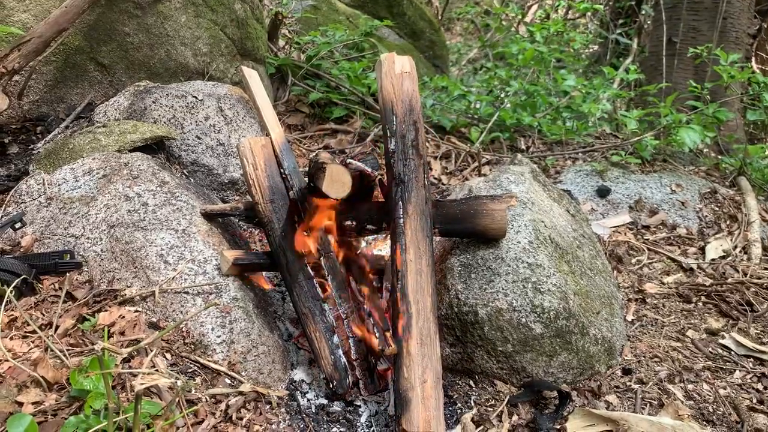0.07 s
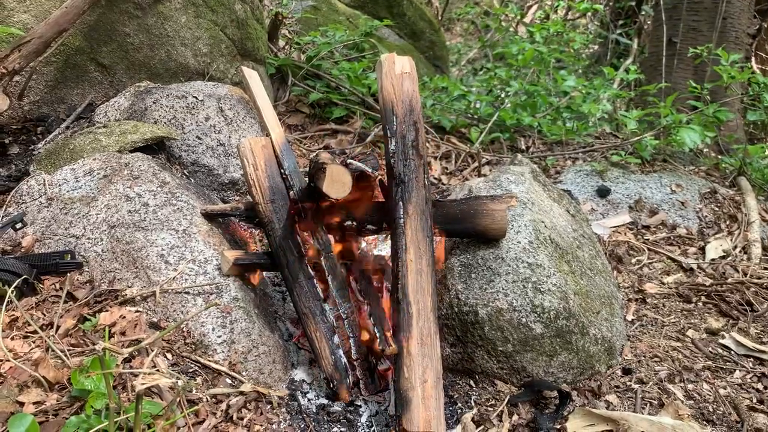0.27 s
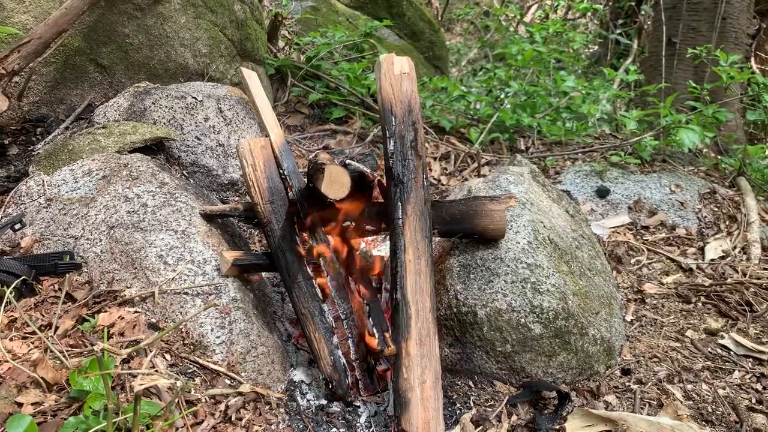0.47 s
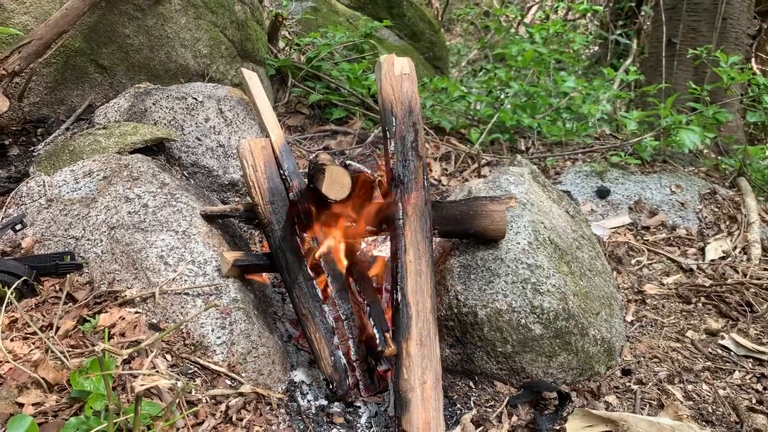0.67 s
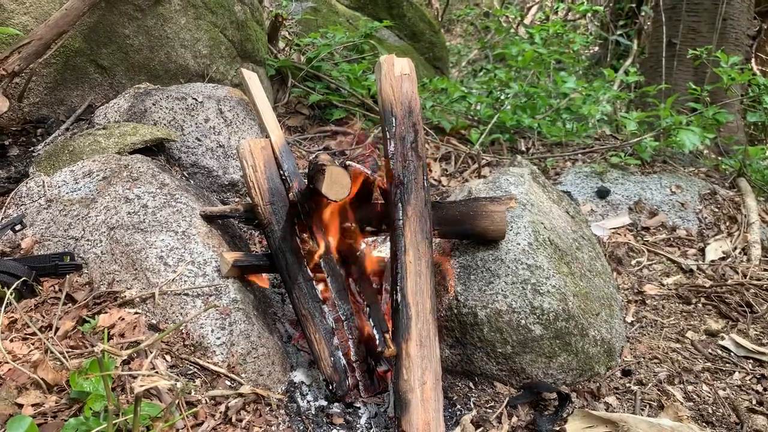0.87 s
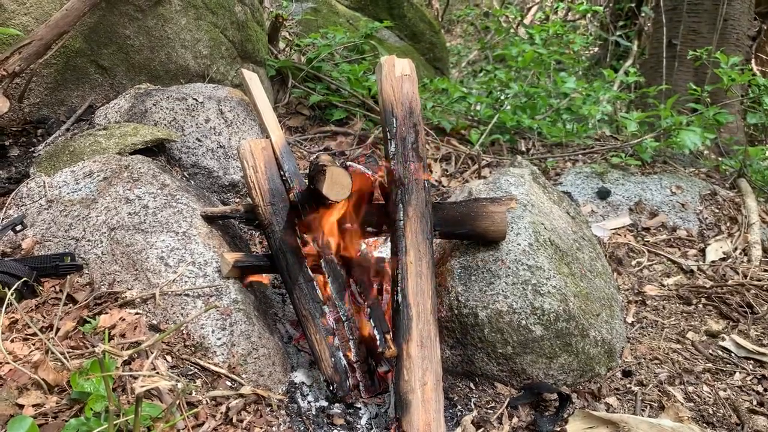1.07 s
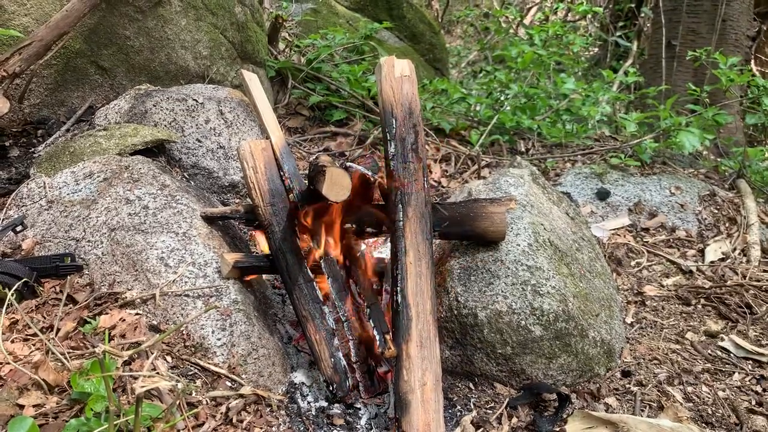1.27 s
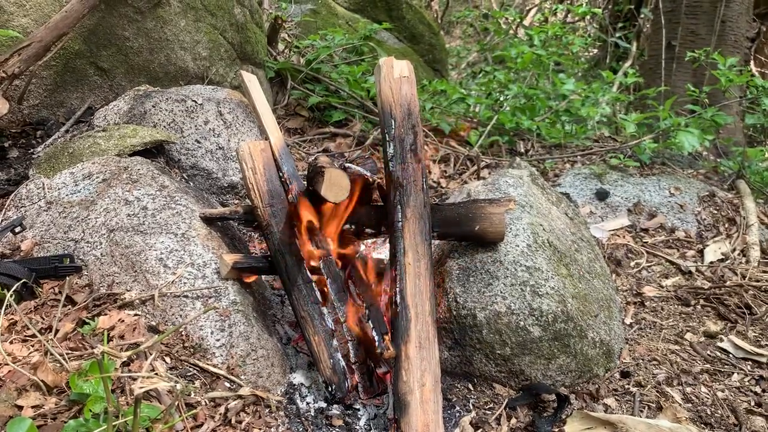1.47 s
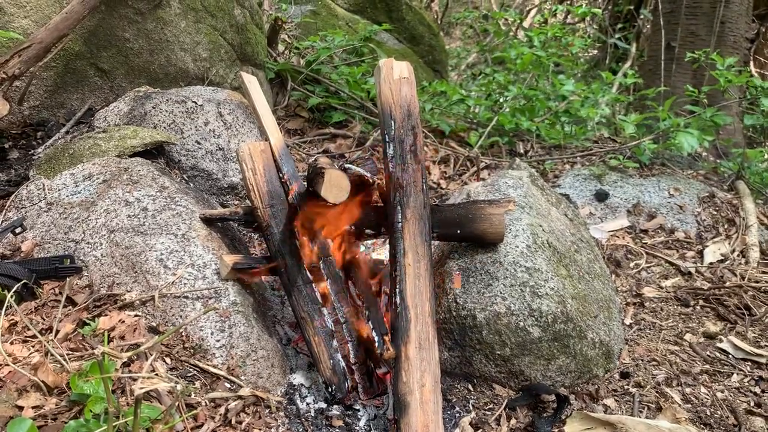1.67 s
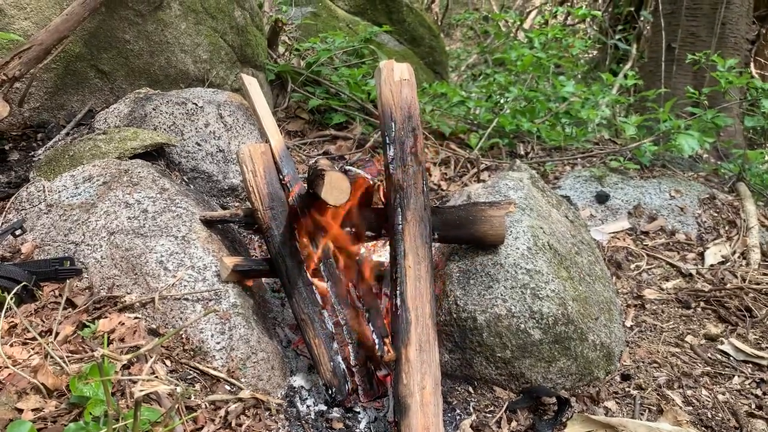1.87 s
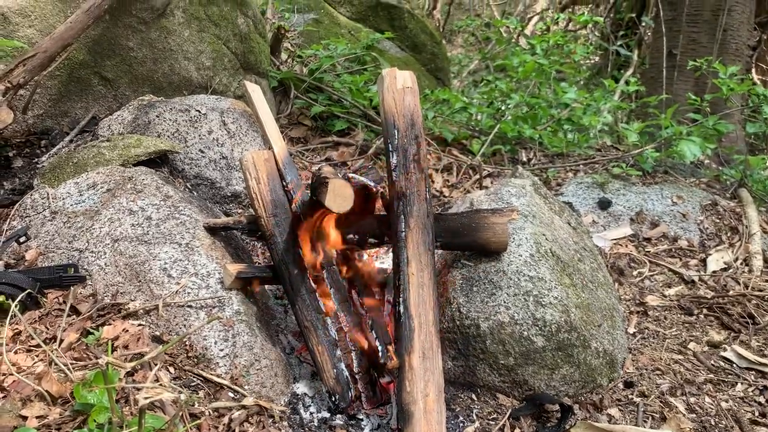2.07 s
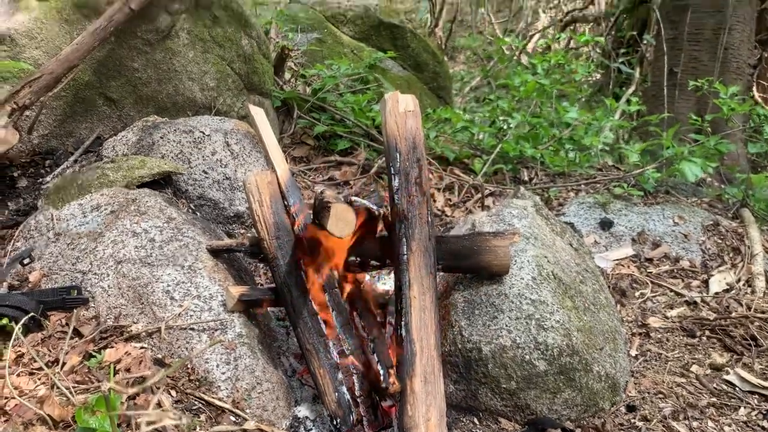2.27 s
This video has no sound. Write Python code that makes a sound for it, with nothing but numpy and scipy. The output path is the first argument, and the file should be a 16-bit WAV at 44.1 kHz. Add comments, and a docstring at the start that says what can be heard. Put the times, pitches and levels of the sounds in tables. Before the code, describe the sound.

Close stereo pickup of a campfire between stones outdoors: steady low burning, one loud early crack that makes the level dip briefly, then irregular smaller pops, a sharper pair midway, and dull flame puffs near the end.

```python
"""A low flutter of flames with a soft hiss, and almost at once a sharp pop: a small wood campfire.
It burns between rocks in a quiet forest, close by and a little to the right. The burning is shaped noise.
Soft puffs are short, dull thumps of flame. The pops, and a faint high tick just before the loudest,
are each one pulse and a spray of noise through ringing resonances, scattered by rocks and trees.
Low notes trail the crack, so a pop ends in a falling thud; the loudest makes the gain control duck."""
import sys
import numpy as np
from scipy import signal
from scipy.fft import rfft, irfft
from scipy.io import wavfile
from scipy.ndimage import uniform_filter1d, minimum_filter1d

SR = 44100
rng = np.random.default_rng(int(sys.argv[2]) if len(sys.argv) > 2 else 0)


def dump_mix(stems):
    """Bounce the given channels to the path in sys.argv[1] as a 16-bit WAV at rate SR."""
    frames = np.atleast_2d(stems).T  # one column per channel
    limited = np.clip(frames, -1, 1)  # hard clip at full scale
    pcm = np.round(limited * 32767).astype(np.int16)
    wavfile.write(sys.argv[1], SR, pcm)


N = 101430
FREQS = np.maximum(np.arange(N // 2 + 1) * SR / N, 1)  # Hz, kept above zero for the logarithms
FLAME_TOP_HZ = 600  # below it the flames dominate, above it the hiss and the scattered treble


def amp(db):
    """Turn decibels into a gain."""
    return 10 ** (np.asarray(db) / 20)


def curve(points):
    """Join (Hz, value) points by straight lines on a log-frequency axis."""
    hz, value = np.array(points, float).T
    return np.interp(np.log(FREQS), np.log(hz), value)


def causal(gain):
    """Spectrum of the most abrupt sound that has this gain (minimum phase)."""
    cepstrum = irfft(np.log(gain + 1e-9), N)
    # fold the second half onto the first, so that nothing sounds before the start
    fold = 1 + np.sign(np.fft.fftfreq(N))
    return np.exp(rfft(cepstrum * fold))


def pan(points):
    """Left and right gains of equal total power, from left minus right in dB."""
    difference_db = curve(points)
    gains = amp(np.array([difference_db, -difference_db]) / 2)
    return gains / np.sqrt(np.mean(gains ** 2, axis=0))


def delay(seconds):
    """Spectrum of a pure delay."""
    return np.exp(-2j * np.pi * FREQS * seconds)


LEFT_LAG_S = 0.0003966


def both_sides():
    """Sound from the fire reaches the right side first and the left a moment later."""
    return np.array([delay(LEFT_LAG_S), delay(0)])


def walk(rate_hz):
    """Slow random wander with a spread near 1: random steps, smoothed twice."""
    k = int(SR / rate_hz)
    steps = np.repeat(rng.standard_normal(N // 100), k)[:N]
    smooth = uniform_filter1d(uniform_filter1d(steps, k), k)
    return np.sqrt(2) * smooth


def burst(decay_s):
    """Spectrum of a dying noise of unit energy, unrelated left and right."""
    fade = np.exp(-np.arange(N) / SR / decay_s)
    noise = rng.standard_normal((2, N)) * fade
    return rfft(noise / np.sqrt(np.sum(noise ** 2, axis=1, keepdims=True)))


def resonance(hz, width_hz):
    """Gain of one resonance, 1 at its centre and falling off to both sides."""
    return 1 / np.hypot(1, (FREQS - hz ** 2 / FREQS) / width_hz)


# low notes are late by about this many of their own cycles, fading out above the top
LOW_LAG_CYCLES, LOW_LAG_TOP_HZ = 1.35, 1274


def late_lows(spectrum):
    """Turn a spectrum back into a wave, with the lows trailing the highs."""
    cycles = LOW_LAG_CYCLES * np.log((1 + FREQS / 20) / (1 + FREQS / LOW_LAG_TOP_HZ))
    return irfft(spectrum * np.exp(-2j * np.pi * cycles), N)


# Tone of the steady burning. Each row: frequency in Hz, relative level in dB per Hz.
BURN_COLOUR = [(20, -13), (45, 3), (80, -2), (130, 1), (200, 0.5), (310, -0.5), (430, -8), (700, -11.5),
               (1000, -12), (1400, -13.5), (1750, -15.5), (2250, -15), (3000, -23.5), (4300, -19.5),
               (5400, -26), (7000, -21.5), (8000, -33), (8900, -57.5), (12000, -52.5), (16000, -64.5)]
# Balance of the burning and the puffs. Each row: frequency in Hz, left minus right in dB.
BURN_PAN = [(60, 0.5), (110, -6), (250, 1), (1200, -1.5), (2400, -8), (4400, -7), (7500, 1)]
# How alike the two sides are. Each row: frequency in Hz, share of the power common to both sides (0 to 1).
LIKENESS = [(100, 0.54), (300, 0.91), (1300, 0.66), (3000, 0.083), (8000, 0.067)]
# Slow swell of the low flames. Each row: time in seconds, level in dB.
FLAME_LEVEL = [(0, -1), (.6, 0), (.9, 1), (1.2, 1), (1.65, -2), (1.85, 1), (2.3, 1.5)]
BURN_DB = -41
FLUTTER_DB, HISS_FLICKER_DB, FLUTTER_HZ = 1.5, 1.5, 14.38  # spread of each wander, and its new steps a second
SIZZLE_PER_S, SIZZLE_DB = 200, -20  # average number of ticks, and their level against the airy noise


def burning():
    """Noise flutters as flames in the lows; above, it is a hiss with tiny ticks from the embers."""
    share = np.clip(curve(LIKENESS), 0, 1)
    common = np.sqrt(share) * both_sides() * rfft(rng.standard_normal(N))
    separate = np.sqrt(1 - share) * rfft(rng.standard_normal((2, N)))
    air = common + separate

    ticks = (rng.random(N) < SIZZLE_PER_S / SR) * rng.standard_normal(N)
    sizzle = amp(SIZZLE_DB) * both_sides() * rfft(ticks / ticks.std())

    colour = amp(curve(BURN_COLOUR))
    colour = amp(BURN_DB) * colour / np.sqrt(np.mean(colour ** 2)) * pan(BURN_PAN)

    low = 1 / (1 + (FREQS / FLAME_TOP_HZ) ** 2)
    swell_db = np.interp(np.arange(N) / SR, *np.array(FLAME_LEVEL).T)
    flutter = amp(swell_db + FLUTTER_DB * walk(FLUTTER_HZ))
    flames = irfft(air * colour * low, N) * flutter
    flicker = amp(HISS_FLICKER_DB * walk(FLUTTER_HZ))
    hiss = irfft((air + sizzle) * colour * (1 - low), N) * flicker
    return flames + hiss


# Soft puffs of flame. Each row: start in seconds, pitch in Hz, level in dB, width in octaves.
PUFFS = [(1.052, 54, 16.5, 0.2), (1.807, 125, 20.5, 0.28), (1.854, 113, 23, 0.35), (2.033, 116.7, 26, 0.87),
         (2.253, 50.6, 17.5, 0.33)]


def puffs():
    """Gas catches fire in dull, falling thumps, each a narrow hump of low notes."""
    out = 0
    for start, hz, db, octaves in PUFFS:
        hump = np.exp(-(np.log2(FREQS / hz) / octaves) ** 2 / 2)
        out = out + amp(db) * hump * delay(start)
    return late_lows(out * both_sides() * pan(BURN_PAN))


# Resonances of a split log. Each row: ratio to the ring pitch, level in dB, width in Hz.
WOOD_MODES = [(.73, -1, 254), (1, 2.5, 256), (1.18, -15, 250), (1.38, -14.5, 248)]


def wood(ring_hz):
    """Gain of the brief resonances of a split log, with the notes far above them cut."""
    power = 0
    for ratio, db, width_hz in WOOD_MODES:
        power = power + (amp(db) * resonance(ratio * ring_hz, width_hz)) ** 2
    return np.sqrt(power) / np.hypot(1, (FREQS / ring_hz / 1.345) ** 3)


# Pops, and a faint high tick just before the loudest. Each row: start in seconds, then relative levels in dB
# of the low thud, knock, bite, crack and top fizz, ring pitch in Hz, its level in dB, splinter decay in
# seconds, lower ping in Hz, its level in dB, upper ping in Hz, its level in dB, extra left minus right in dB.
POPS = [(0.0482, 13, 3, -8, -8, -20, 1880, 8.5, 0.00096, 890, 9, 3390, 10, -1),
        (0.2394, 3, -2, -15, -5.5, -23.5, 2000, -9, 0.0012, 1000, 5, 4340, 11, 2),
        (0.2405, 32.5, 8.5, 18, -4.5, -13, 2000, 25.5, 0.0038, 1490, 18, 2515, 20, 0.5),
        (0.6755, -15, -18, -14, -17.5, -26.5, 2480, -11.5, 0.00089, 4340, -24, 6840, -1, 1),
        (1.0366, 18.5, -4, -9, -16.5, -36, 1410, 11, 0.0012, 1200, 11.5, 1900, 5, -0.5),
        (1.1148, -4, -21, -17, -28, -41, 2330, -8.5, 0.00067, 4430, -22, 6900, -20, 0),
        (1.4339, 20, 14.5, 10.5, 5.5, -5, 1920, 15.5, 0.0011, 4500, 10, 6780, 17, 0),
        (1.479, 10.5, 6, -1, 0.5, -20, 1860, 9, .001, 3950, 13, 4520, 4.5, -3.5),
        (2.1433, 8.5, 5, 5, -7.5, -7.5, 2080, -5, 0.0012, 4540, 7, 5800, 10, -2)]
# Where thud, knock, bite, crack and fizz lie. One column: frequency in Hz.
POP_ANCHORS_HZ = [320, 800, 2300, 4500, 10500]
# Colour that all these sounds share. Each row: frequency in Hz, added level in dB.
POP_COLOUR = [(25, -14), (90, -8.5), (240, 1), (450, -4), (900, 1.5), (1150, -5), (1400, -1.5),
              (1630, -16.5), (1950, 0.5), (2300, 1.5), (2550, -4.5), (2900, -0.5), (3250, 2.5), (3700, 9),
              (4200, 8), (4550, 4.5), (4950, -6), (6000, 10), (7500, 13), (8800, -4), (12000, -1.5),
              (16000, -32)]
# Balance of the pops and the tick. Each row: frequency in Hz, left minus right in dB.
POP_PAN = [(100, -12), (280, 3), (650, -3), (1300, -11), (2100, -14.5), (3500, -2), (7000, 4), (12000, 2)]
PING_WIDTH_HZ = 100  # of the two narrow high resonances
SPLINTER_DB = -2  # short noise right after the pulse, like tearing fibres
STONE_ECHO_S, STONE_ECHO_DB = 0.001087, -10.5  # the nearest stone throws the sound back
ROCKS_S, ROCKS_DB = 0.005, -9  # scatter from the stones around the fire
FOREST_S, FOREST_DB = 0.015, -13.5  # scatter from the trees


def pops():
    """A pulse and a spray of splinter noise drive wood and ping resonances; rocks and trees scatter them.
    Gas pockets bursting in the wood make the pops; the faint tick is built the same way."""
    out = 0
    treble = FREQS ** 2 / (FREQS ** 2 + FLAME_TOP_HZ ** 2)
    echo = amp(STONE_ECHO_DB) * treble
    splinters = amp(SPLINTER_DB) * treble
    pulse = both_sides() * (1 + echo * delay(STONE_ECHO_S))

    for (start, thud_db, knock_db, bite_db, crack_db, fizz_db, ring_hz, ring_db,
         tear_s, lower_hz, lower_db, upper_hz, upper_db, left_db) in POPS:
        levels_db = (thud_db, knock_db, bite_db, crack_db, fizz_db)
        body = amp(curve(list(zip(POP_ANCHORS_HZ, levels_db))) + curve(POP_COLOUR))

        lower_ping = amp(lower_db) * resonance(lower_hz, PING_WIDTH_HZ)
        upper_ping = amp(upper_db) * resonance(upper_hz, PING_WIDTH_HZ)
        # cut the pings from an octave above the upper one
        pings = np.hypot(lower_ping, upper_ping) / np.hypot(1, (FREQS / upper_hz / 2) ** 4)
        rings = np.hypot(amp(ring_db) * wood(ring_hz), pings)

        # dividing keeps the power about the same with echo and splinters added
        push = (pulse + splinters * burst(tear_s)) / np.sqrt(1 + splinters ** 2 + echo ** 2)
        scattered = push + amp(ROCKS_DB) * treble * burst(ROCKS_S)
        near = scattered * causal(np.hypot(body, rings))
        far = amp(FOREST_DB) * burst(FOREST_S) * causal(body)
        side = amp([[left_db / 2], [-left_db / 2]])
        out = out + (near * side + far) * delay(start)
    return late_lows(out * pan(POP_PAN))


def scene():
    """The whole fire: burning, pops and puffs together."""
    return burning() + pops() + puffs()


def trailing_mean(x, seconds):
    """Mean over the moments just past."""
    k = int(seconds * SR)
    return signal.fftconvolve(x, np.ones(k) / k)[:N]


DUCK_ABOVE_DB, DUCK_DB = -16.5, -8.5  # level that starts a dip, and the deepest dip
DUCK_HOLD_S, DUCK_SLEW_S = 0.1, 0.053  # how long a dip is held, and how long it takes to move
TOP_HZ = 16300


def record(dry):
    """A slow gain control dips after a very loud pop; peaks are clipped and the top is cut."""
    power = trailing_mean(np.mean(dry ** 2, axis=0), .01)
    level_db = 10 * np.log10(np.abs(power) + 1e-12)
    # 0 below the threshold, 1 from one decibel above it
    over = np.clip(level_db - DUCK_ABOVE_DB, 0, 1)
    k = int(DUCK_HOLD_S * SR / 2)
    # the largest value of the recent past
    held = -minimum_filter1d(-over, 2 * k + 1, origin=k, mode="constant")
    ducked = dry * amp(DUCK_DB * trailing_mean(held, DUCK_SLEW_S))
    top_cut = signal.ellip(8, .2, 70, TOP_HZ, fs=SR, output="sos")
    return signal.sosfilt(top_cut, np.clip(ducked, -1, 1))


dry = scene()
out = record(dry)
dump_mix(out)
```